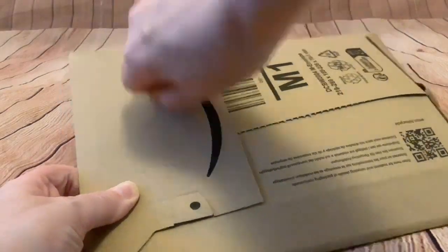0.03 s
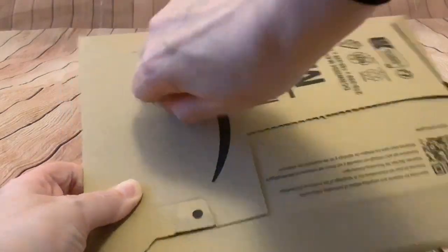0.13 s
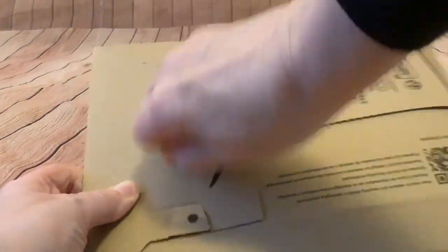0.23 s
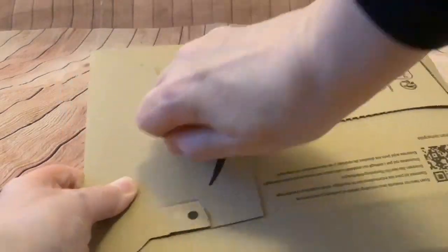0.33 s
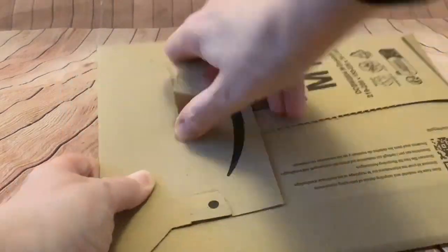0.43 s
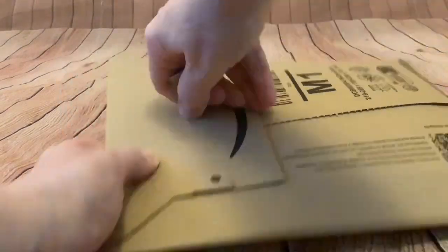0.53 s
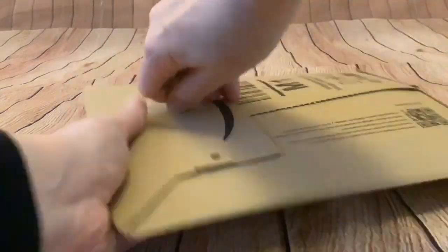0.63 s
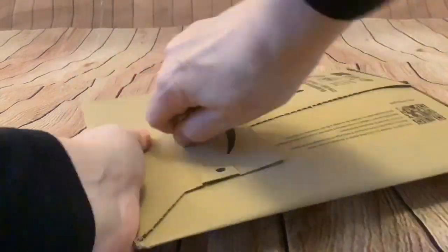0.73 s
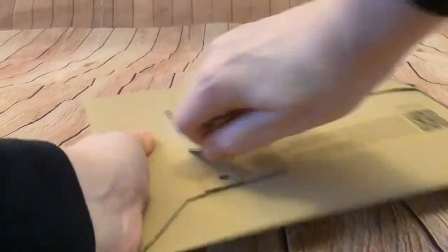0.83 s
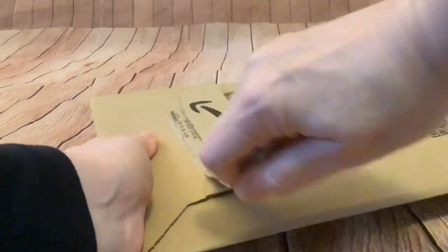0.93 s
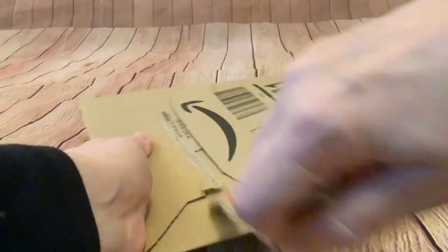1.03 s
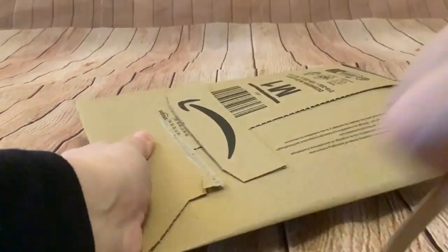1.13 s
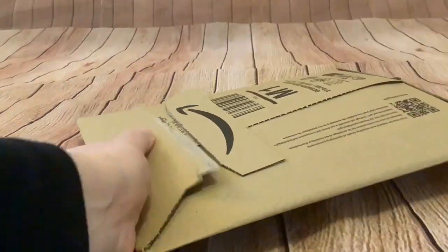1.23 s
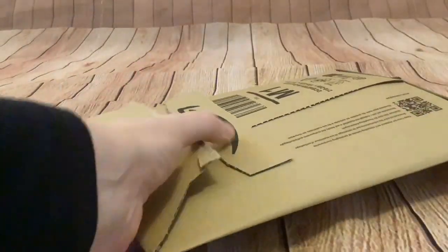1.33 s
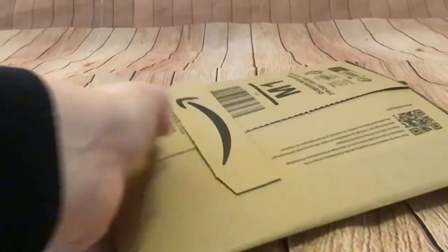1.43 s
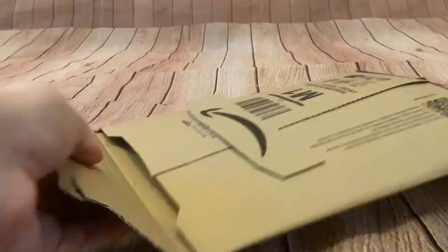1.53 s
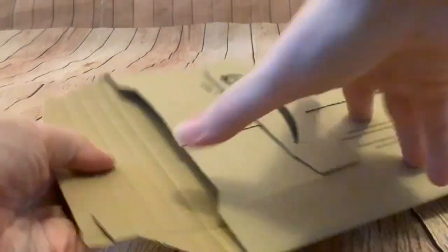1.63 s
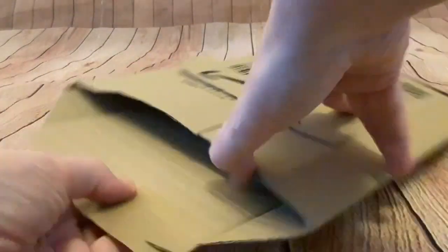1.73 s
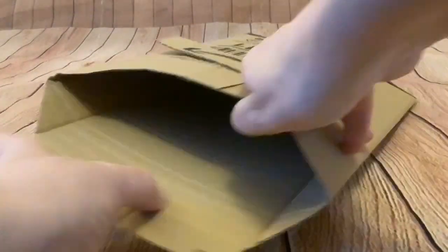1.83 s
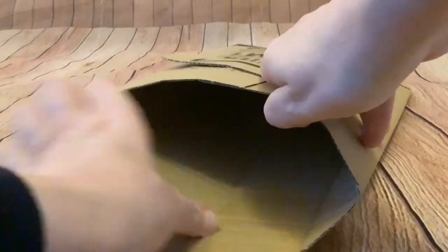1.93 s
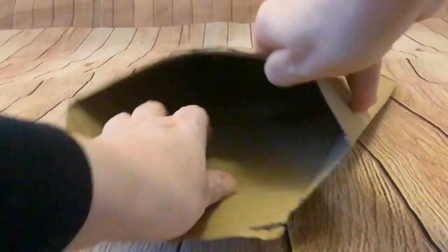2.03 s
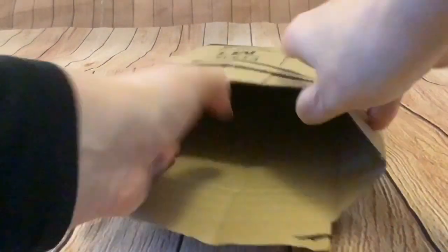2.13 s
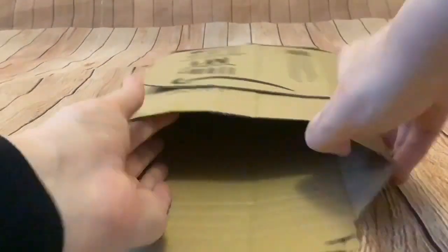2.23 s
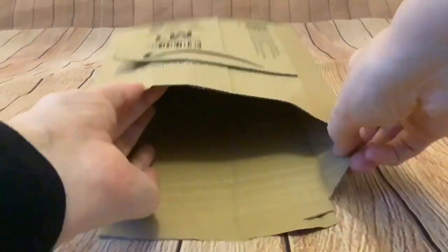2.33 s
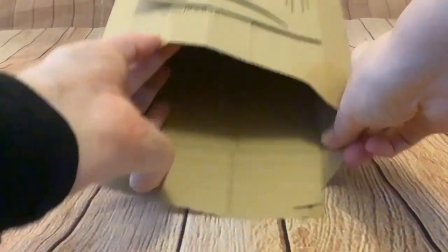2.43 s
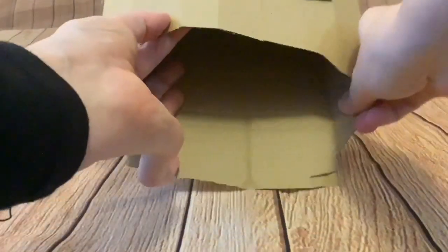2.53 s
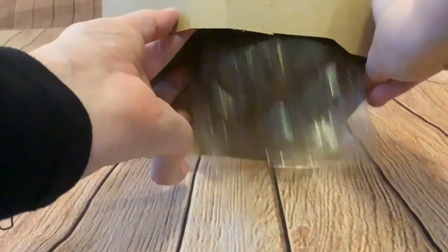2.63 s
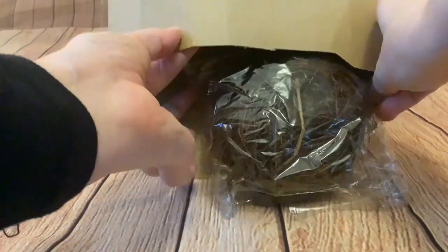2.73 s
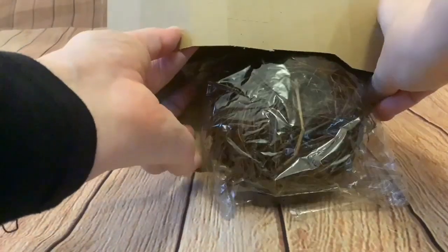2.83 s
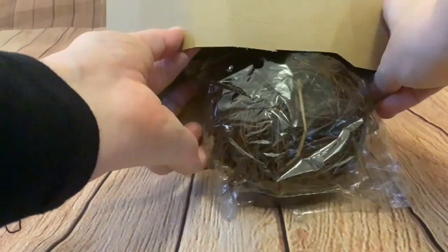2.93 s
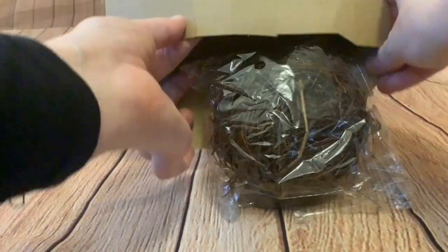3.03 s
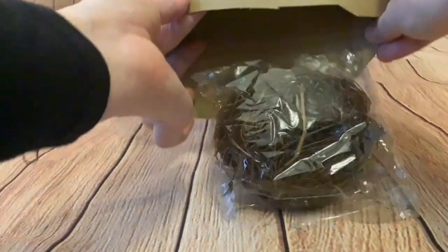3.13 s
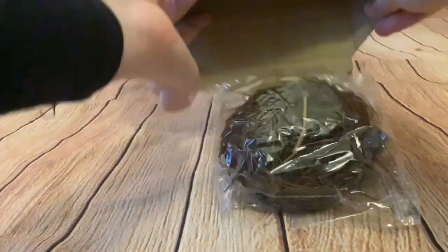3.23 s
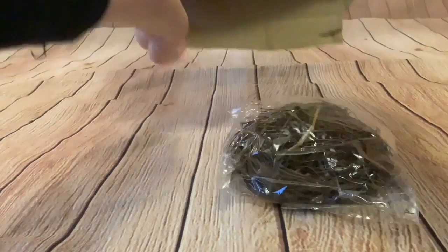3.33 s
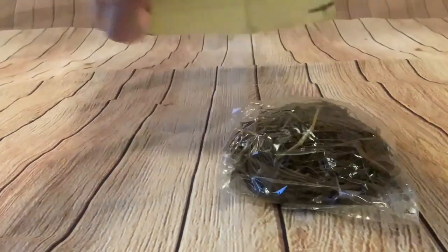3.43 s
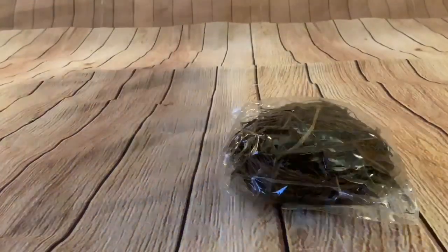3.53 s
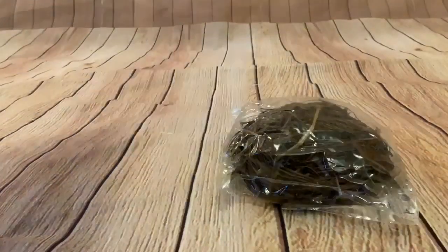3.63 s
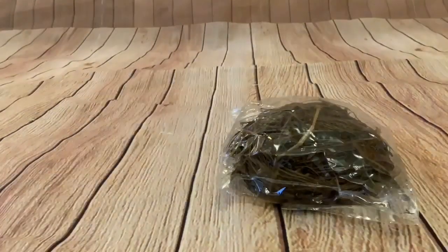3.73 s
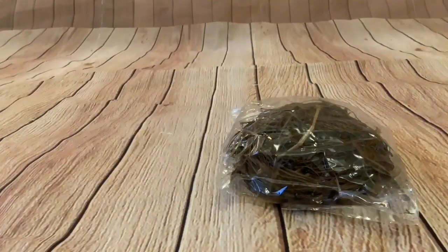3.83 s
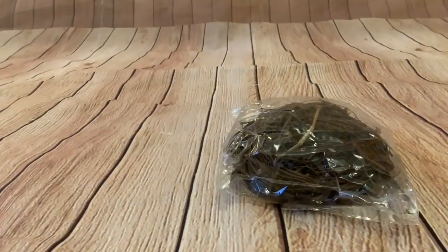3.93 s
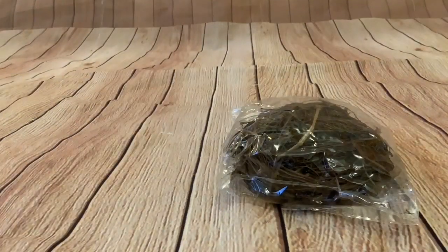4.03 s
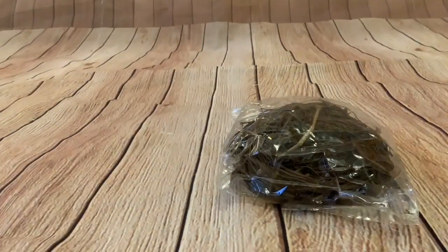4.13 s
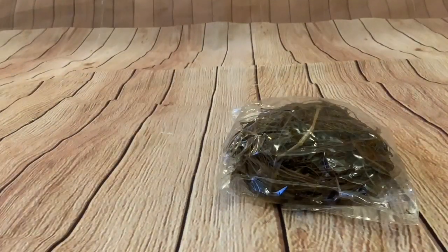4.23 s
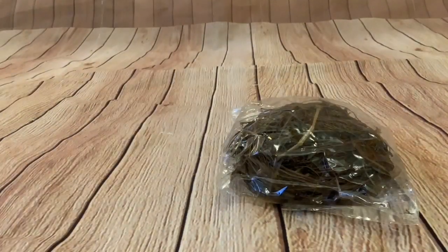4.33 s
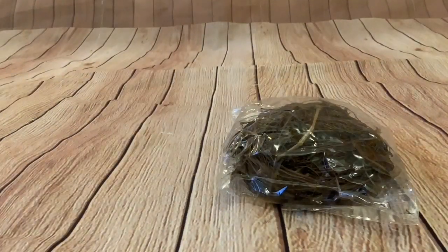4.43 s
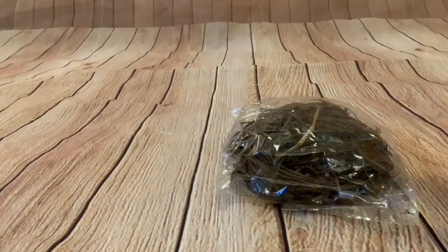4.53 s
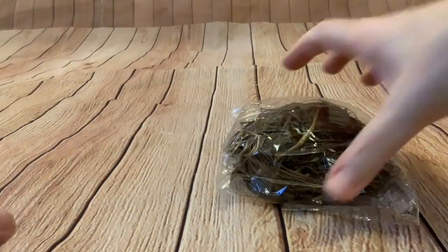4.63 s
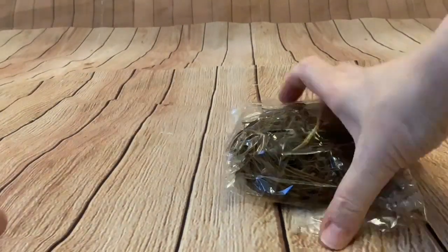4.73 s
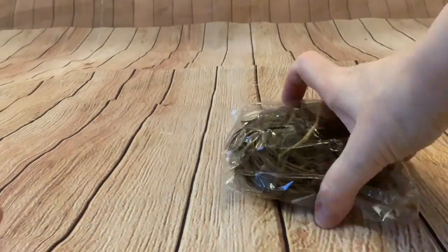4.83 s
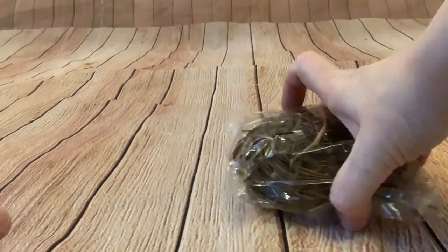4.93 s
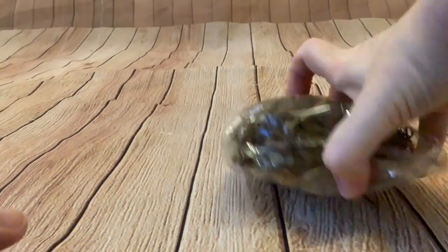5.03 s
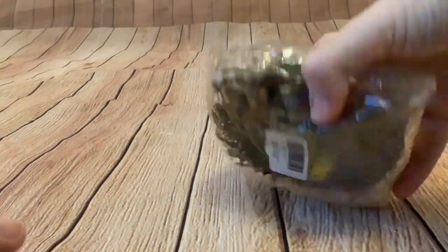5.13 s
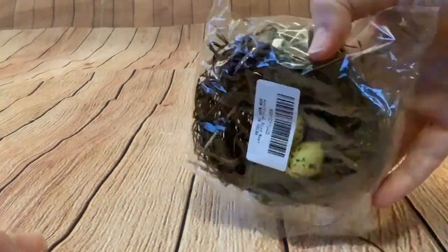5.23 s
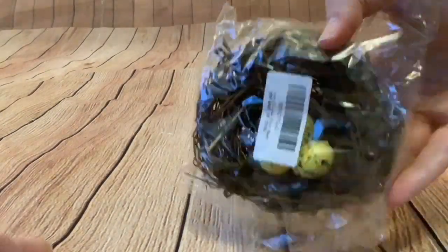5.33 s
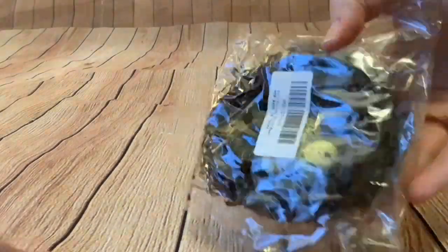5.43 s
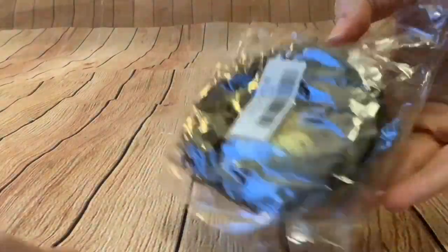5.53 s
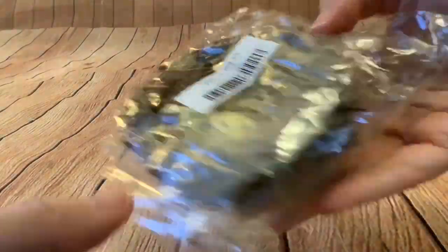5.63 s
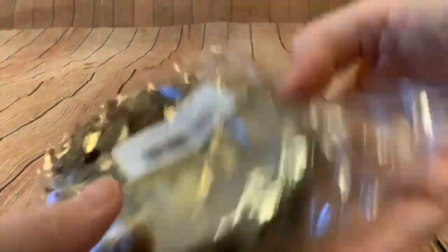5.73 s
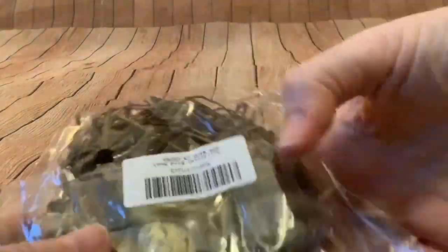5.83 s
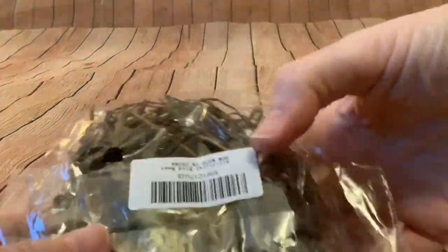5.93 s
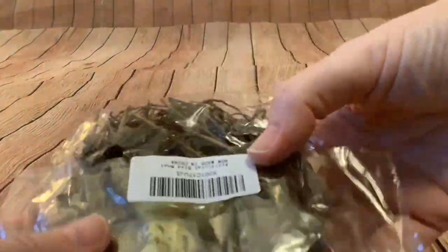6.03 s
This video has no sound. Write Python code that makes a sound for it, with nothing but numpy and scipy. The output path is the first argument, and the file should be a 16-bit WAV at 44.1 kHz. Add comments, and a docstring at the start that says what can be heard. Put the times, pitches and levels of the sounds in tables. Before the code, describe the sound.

Crisp card fibres rip and crack in bursts, stiff card rustles and knocks aside, then plastic film crackles sharply in the hands.

```python
"""Card fibres snap as a mailer on a wooden table is torn open along its strip, spread apart, emptied
and put aside: each burst of noise cracks brightly, then excites the modes of the hollow card.
A thin plastic bag slides out, is picked up and crinkles close by, as short flips ringing in high bands.
Rubbing is dense random grains; the blows of the card laid down are decaying noise through its modes.
A short diffuse tail surrounds the sounds near the table; a small microphone drops the bass."""
import sys
import numpy as np
from scipy import signal
from scipy.fft import rfft, irfft, next_fast_len
from scipy.io import wavfile

SR = 44100
rng = np.random.default_rng(int(sys.argv[2]) if len(sys.argv) > 2 else 0)


def output_pcm(signal):
    """Save a mono or channel-first signal as 16-bit PCM at the path in sys.argv[1].

    Samples are clipped to [-1, 1] before scaling.
    """
    pcm = np.clip(np.atleast_2d(signal).T, -1, 1) * 32767
    wavfile.write(sys.argv[1], SR, np.round(pcm).astype(np.int16))


N = 268569   # length in samples


def from_db(db):
    """Logarithmic level: decibels to amplitude gain."""
    return 10 ** (np.asarray(db) / 20)


def rms_one(x):
    """Normalisation to unit root-mean-square amplitude."""
    return x / np.sqrt(np.mean(x ** 2) + 1e-20)


def in_time(rows):
    """Linear interpolation of the columns of a curve table, sample by sample."""
    s, *columns = np.transpose(rows)
    return [np.interp(np.arange(N) / SR, s, column) for column in columns]


def drift(rate):
    """Low-passed noise: slow fluctuation of unit rms, changing about rate times a second."""
    r = np.exp(-2 * np.pi * rate / SR)
    noise = rng.standard_normal(N + SR)
    slow = signal.lfilter([1], [1, -2 * r, r * r], noise)
    return rms_one(slow[SR:])   # the first second lets the filter settle


def grains(per_s, spread_db):
    """Impulse noise: clicks at random instants, of very uneven size and either sign."""
    sizes = from_db(spread_db * np.minimum(rng.exponential(1, N), 4))
    signs = rng.choice([-1, 1], N)
    return sizes * signs * (rng.random(N) < per_s / SR)


def resonance(x, hz, width_hz):
    """Damped oscillator: a two-pole band with unit gain on top."""
    r = np.exp(-np.pi * width_hz / SR)
    poles = [1, -2 * r * np.cos(2 * np.pi * hz / SR), r * r]
    return signal.lfilter([(1 - r * r) / 2, 0, (r * r - 1) / 2], poles, x + 1e-18)


def body(x, modes, spread_db=0, favoured_hz=None, wander_db=0):
    """Modal superposition: parallel modes, each with its own, possibly wandering, excitation strength."""
    hz, width_hz, db = np.transpose(modes)
    db = db + spread_db * rng.normal(0, 1, len(modes))
    if favoured_hz:   # a blow loses 14 dB per octave away from this pitch
        db = db - 14 * np.abs(np.log2(hz / favoured_hz))
    if wander_db:   # steady rubbing
        db = [level + wander_db * drift(26) for level in db]
    # neighbouring modes alternate in sign
    return sum((-1) ** k * from_db(db[k]) * resonance(x, hz[k], width_hz[k]) for k in range(len(modes)))


# modes of the card panel and of the hollow inside, both played by body(): f/Hz, bandwidth/Hz, level/dB
PANEL_MODES = [(128, 66, -6.5), (164, 79, -1.5), (238, 72, 0.5), (294.7, 93, -1), (394, 92, -2),
               (463, 56, -1.5), (566, 94, -6.5)]
CAVITY_MODES = [(624, 37, -11), (836, 190, -6.5), (1050, 355, -1), (1158, 230, 0.5), (1550, 298, -10),
                (1750, 840, -20)]

# spectral colour of dry rustling: f/Hz, level/dB (per Hz)
RUSTLE_SPECTRUM = [(1100, -40.5), (1800, 2), (2450, -6), (3000, -4.5), (4700, -4), (10000, -1.5),
                   (15000, -6), (16500, -0.5)]


def bright(x):
    """Spectral shaping: the colour of dry rustling, interpolated over log frequency."""
    hz, db = np.transpose(RUSTLE_SPECTRUM)
    size = next_fast_len(len(x))
    log_hz = np.log(np.arange(size // 2 + 1) * SR / size + 1)
    gain = from_db(np.interp(log_hz, np.log(hz), db))
    return irfft(rfft(x, size) * gain, size)[:len(x)]


def far(x):
    """Band limitation: card out of reach keeps a papery band and loses its top."""
    far_hz, width_hz = 3100, 2200
    papery = resonance(resonance(x, far_hz, width_hz), far_hz, width_hz)
    return papery + 0.075 * x


def add(out, s, peak_db, sound):
    """Linear superposition: places a short sound at its time and peak level."""
    i = max(round(s * SR), 0)
    sound = sound[:N - i]
    out[i:i + len(sound)] += from_db(peak_db) * sound / np.abs(sound).max()


ROOM_T60_S, ROOM_DB = 0.17, -12.5   # time to fall by 60 dB; level of the unit-energy tail


def room(x):
    """Reverberation: a short, exponentially decaying diffuse tail from the table top and near walls."""
    t = np.arange(SR // 3) / SR
    decay = from_db(-60 * t / ROOM_T60_S)
    tail = rng.standard_normal(len(t)) * decay * (t > .003)
    return signal.fftconvolve(x, tail / np.sqrt(np.sum(tail ** 2)))[:N]


def hiss():
    """Stationary white noise: a faint floor."""
    return from_db(-84.5) * rng.standard_normal(N)


RUMBLE_S, RUMBLE_DB = 5.9, -31.5   # onset, rms level once risen


def rumble():
    """Low-frequency turbulence: the hand brings the bag close and stirs the air at the microphone."""
    swell = np.clip((np.arange(N) / SR - RUMBLE_S) / 0.019, 0, 1)
    return from_db(RUMBLE_DB) * swell * drift(30)


SQUEAK_S, SQUEAK_LENGTH_S = 4.948, .045
SQUEAK_HZ, SQUEAK_DB = 423, -42


def squeak():
    """Stick-slip: a finger slips on the film with a brief, slightly unsteady note."""
    out, t = np.zeros(N), np.arange(round(SQUEAK_LENGTH_S * SR)) / SR
    unsteady_time = np.cumsum(1 + 0.063 * drift(57)[:len(t)]) / SR
    tone = np.sin(2 * np.pi * SQUEAK_HZ * unsteady_time)
    envelope = np.sin(np.pi * t / SQUEAK_LENGTH_S) ** 0.19
    add(out, SQUEAK_S, SQUEAK_DB, tone * envelope)
    return out


# empty mailer laid down out of reach:
# t/s, panel peak level/dB, cavity peak level/dB, favoured panel f/Hz, shudder decay/s
LAYING_DOWN_KNOCKS = [(3.614, -29, -55, 180, 0.01), (3.645, -37, -40, 248, 0.015),
                      (3.681, -33, -48, 302, 0.015), (3.703, -24, -53, 347, 0.0038),
                      (3.769, -21, -45, 403, 0.0027), (3.846, -49.5, -52.5, 407, 0.072),
                      (4.35, -31, -46, 291, 0.021), (4.41, -19, -24, 575, 0.016)]


def knocks():
    """Impact excitation: a sudden dull contact, then a shudder to rest, waking the low cavity modes."""
    out, t = np.zeros(N), np.arange(SR // 5) / SR
    for s, panel_db, cavity_db, panel_hz, length in LAYING_DOWN_KNOCKS:
        envelope = np.exp(-t / 0.00021) + 0.32 * np.exp(-t / max(length, .001))
        shudder = rng.standard_normal((2, len(t))) * envelope
        dull = signal.lfilter([1], [1, -1.8, .81], shudder)
        cavity = body(dull[0], CAVITY_MODES, spread_db=3.0, favoured_hz=787)
        favoured_panel = body(dull[1], PANEL_MODES, spread_db=3.5, favoured_hz=panel_hz)
        add(out, s, cavity_db, cavity)
        add(out, s, panel_db, favoured_panel + 0.37 * body(dull[1], PANEL_MODES))
    return out


# separate movements of the hands and contents:
# t/s, length/s, rustle level/dB, swell by the end/dB, panel level over rustle/dB
MOVEMENTS = [(0.0, 1, -52.5, -8, 3.5), (0.348, 0.093, -59, 15.5, 1), (0.522, 0.013, -48, -4, -16),
             (0.59, 0.06, -52, 4.5, -5), (0.703, 0.036, -51, 8.5, 3.5), (0.801, 0.03, -37, 0, 9.5),
             (0.866, 0.085, -44.5, 2, 10.5), (0.997, 0.045, -34, 1, 9), (1.094, 0.047, -41, -14, -32),
             (1.195, 0.33, -59.5, 5.5, -2.5), (1.543, 0.14, -64.5, 14.5, -8.5), (1.7, 0.23, -46, -2, 0),
             (1.963, 0.18, -46.5, -4, -0.5), (2.171, 0.13, -55.5, 12.5, -6), (2.313, 0.42, -48, 5, -8),
             (2.657, 0.091, -27, -19.5, -7.5), (2.801, 0.18, -56.5, -10, -4),
             (2.946, 0.15, -49.5, -9, -7.5), (3.094, .215, -52, 10, -5), (3.372, 0.088, -62.5, 11, -1),
             (3.496, 0.15, -66, 19, -3.5), (3.683, 0.026, -42, -1, 6.5), (3.759, 0.014, -47.5, 3, 2),
             (3.78, 0.11, -58.5, -5.5, 8), (3.994, 0.11, -57, -2, 4.5), (4.166, 0.11, -74.5, 14.5, 5.5),
             (4.36, 0.0092, -54.5, -12, 22), (4.415, 0.041, -62, -5, 29.5), (4.48, 0.19, -83, -13, 27),
             (4.711, 0.051, -61, 20, -5.5), (4.808, 0.12, -40, -3.5, -5.5), (4.951, 0.32, -45.5, 8.5, -7),
             (5.272, 0.31, -45, -7, -5), (5.632, 0.24, -40.5, 1.5, -7.5), (5.912, 0.054, -47, 9.5, -15.5),
             (5.981, .11, -34.5, -5, -4.5)]
# fibres of the card snapping or buckling, played by movements() as fizz and by snaps() as cracks:
# t/s, crack peak level/dB, cavity peak level/dB, panel peak level/dB, favoured panel f/Hz, crack length/s
FIBRE_SNAPS = [(0.0014, -10, -13.5, -15, 375, 0.0014), (0.029, -20, -24.5, -14, 350, 0.0026),
               (0.0353, -12, -11.5, -23.5, 193, 0.0038), (0.0431, -19, -11.5, -19, 246, 0.0033),
               (0.0553, -17, -18, -18, 246, 0.002), (0.131, -45, -37, -24.5, 388, 0.001),
               (0.153, -20, -15, -14, 217, 0.0028), (0.175, -19, -24.5, -15.5, 218, 0.008),
               (0.2368, -13, -19, -13.5, 398, 0.0031), (0.2479, -18, -22, -12, 208, 0.0024),
               (0.3535, -27.5, -32, -38.5, 225, 0.0049), (0.3928, -41, -36, -31.5, 376, 0.0017),
               (0.7046, -20.5, -39, -52, 388, 0.0062), (0.7324, -19.5, -28, -21.5, 246, 0.0059),
               (0.7966, -17, -52.5, -24, 298, 0.0035), (0.803, -28, -34, -11, 330, 0.0039),
               (0.812, -10, -12, -13.5, 368, 0.0038), (0.8168, -24, -36, -14, 382, 0.0039),
               (0.8305, -25, -37, -17, 339, 0.0062), (0.8713, -21, -32.5, -36, 332, 0.0085),
               (0.8848, -17, -24, -16.5, 215, 0.001), (0.896, -13, -41, -20.5, 340, 0.0019),
               (0.916, -24, -34, -11.5, 368, 0.0027), (0.923, -12.5, -30, -27.5, 382, 0.00096),
               (0.9397, -11, -18, -7.5, 322, 0.0005), (0.9522, -18, -20, -10.5, 360, 0.0018),
               (0.996, -29, -56.5, -15.5, 334, 0.00099), (1.0054, -18, -18, -10, 320, 0.0033),
               (1.0182, -15.5, -11.5, -9.5, 370, 0.00057), (1.0339, -12.5, -22.5, -20, 238, 0.0017),
               (1.0809, -21.5, -33, -32, 505, 0.0016), (1.707, -39, -53, -55, 198, 0.0023),
               (1.745, -33, -31.5, -57, 302, 0.0021), (1.977, -33, -27.5, -32.5, 340, 0.00093),
               (2.1403, -56, -65, -33.5, 164, 0.0027), (2.2903, -53, -40, -34, 258, 0.0014),
               (2.374, -40, -32.5, -43, 300, 0.0053), (2.6696, -7, -26.5, -18.5, 394, 0.0046),
               (3.267, -20.5, -29.5, -32, 330, 0.0036), (3.297, -47, -47, -31.5, 300, 0.0023)]
ATTACK_DB_PER_S, RELEASE_DB_PER_S = 2601.5, 647
SNAP_FIZZ_DB = -30   # rustle that a snap leaves behind, relative to the peak of its crack


def movements():
    """Addition of powers: each movement sets in fast, swells or fades evenly in dB and dies away."""
    t, power = np.arange(N) / SR, np.full((2, N), 1e-12)   # rows: surface, panel
    fizz = [(s, length, crack_db + SNAP_FIZZ_DB, 0, 0) for s, crack_db, *_, length in FIBRE_SNAPS]
    for s, length, db, swell_db, panel_db in MOVEMENTS + fizz:
        near = slice(max(round((s - .1) * SR), 0), round((s + length + .3) * SR))
        since = t[near] - s
        level = db + swell_db * np.clip(since / length, 0, 1)
        level += ATTACK_DB_PER_S * np.minimum(since, 0)
        level -= RELEASE_DB_PER_S * np.maximum(since - length, 0)
        power[:, near] += from_db([level, level + panel_db]) ** 2
    return 10 * np.log10(power)


def crackle():
    """Buckling of film: clumps of ragged ticks dealt to facets of many sizes; larger folds pop lower."""
    clicks = grains(900 * from_db(4.6 * drift(38)), spread_db=3.0)
    fade = np.exp(-1 / (0.00038 * SR))
    pitches = np.geomspace(1500, 15500, 12)
    dealt = rng.integers(0, 12, N)
    ragged = rng.standard_normal(N)
    flips = []
    for k in range(12):
        envelope = signal.lfilter([1], [1, -fade], clicks * (dealt == k) + 1e-18)
        flips.append(np.roll(ragged, 997 * k) * envelope)   # shifted noise keeps the facets unlike
    facets = bright(sum(resonance(flip, hz, .5 * hz) for flip, hz in zip(flips, pitches)))
    folds = body(sum(flips[:3]), CAVITY_MODES)
    return rms_one(facets) + 0.33 * rms_one(folds)


# what rustles: t/s, share of plastic crackle (0-1), share of dull card far from the microphone (0-1)
RUSTLING_MATERIAL = [(0, 0, 0.2), (1.2, 0, 0.05), (1.3, 0.3, 0.02), (2.5, 0.09, 0.03), (2.8, 0.4, 0.04),
                     (3.33, 0.43, 0.1), (3.42, 0, 0.75), (4.68, 0, .97), (4.71, 0.87, 0), (6.09, 1, 0)]
CAVITY_OVER_DB, CAVITY_FOLLOWS = -1, 0.34   # cavity over rustle; share of the panel's excess added to it
PLASTIC_DAMPS_DB = -4   # cavity change when only plastic rustles


def handling():
    """Friction noise: rubbing in fits and starts, the same jerks exciting surface, cavity and panel."""
    rustle_db, panel_db = movements()
    plastic, away = np.clip(in_time(RUSTLING_MATERIAL), 0, 1)
    cavity_db = rustle_db + CAVITY_OVER_DB + CAVITY_FOLLOWS * (panel_db - rustle_db)
    cavity_db += PLASTIC_DAMPS_DB * plastic
    jerks = from_db(2.67 * drift(8.1) + 2.28 * drift(45))

    friction = bright(grains(11000, spread_db=2.5))
    # bands that wander in level one by one
    shifting = sum(from_db(1.0 * drift(13.0)) * resonance(friction, hz, 0.46 * hz)
                   for hz in (2450, 5360, 7400, 12700, 15900))
    near_card = np.sqrt(1 - away) * rms_one(shifting)
    far_card = np.sqrt(away) * rms_one(far(friction))
    card = rms_one(jerks * (near_card + far_card))
    rustle = np.sqrt(1 - plastic) * card + np.sqrt(plastic) * crackle()

    cavity = rms_one(body(jerks * grains(5000, spread_db=1.5), CAVITY_MODES, wander_db=1.77))
    panel = rms_one(body(jerks * grains(1500, spread_db=3.5), PANEL_MODES))
    return from_db(rustle_db) * rustle + from_db(cavity_db) * cavity + from_db(panel_db) * panel


# creases of the bag flipping over: t/s, peak level/dB, f/Hz (held to 15 kHz at most)
BAG_CREASES = [(1.8449, -19.5, 5200), (1.89, -25.5, 5350), (2.0535, -23, 5300), (2.4014, -24, 14300),
               (2.4651, -15.5, 15200), (2.4877, -22, 10300), (2.6196, -16.5, 11000), (2.648, -15, 14900),
               (2.82, -30, 3800), (2.849, -30.5, 9100), (2.8592, -36.5, 6400), (2.9232, -30.5, 11800),
               (3.0671, -39, 6000), (3.1015, -44, 14600), (3.1627, -22, 9700), (3.192, -26, 11500),
               (3.243, -28, 6060), (3.298, -24, 5000), (3.347, -36, 11000), (3.472, -27.5, 11200),
               (4.74, -28, 11300), (4.7716, -27, 6300), (4.811, -19.5, 7200), (4.8372, -15, 12500),
               (4.8492, -14, 6650), (4.863, -28, 9000), (4.873, -37, 7400), (4.8923, -25, 6070),
               (4.9125, -16, 11100), (4.914, -25, 10800), (4.9815, -17.5, 7160), (5.022, -21, 7400),
               (5.053, -27, 7000), (5.127, -22, 10800), (5.1516, -15, 6300), (5.21, -37, 13000),
               (5.25, -39, 7540), (5.3474, -37, 6400), (5.3824, -19.5, 7400), (5.4354, -24, 6360),
               (5.5965, -24, 10400), (5.6522, -17.5, 9630), (5.688, -20, 13400), (5.7563, -11.5, 5800),
               (5.7915, -13.5, 7700), (5.8071, -16, 11000), (6.0015, -13.5, 5150), (6.0092, -16, 10500),
               (6.042, -7, 4440), (6.0804, -9.5, 14800)]


def crinkles():
    """Snap-through: a crease flips in under a millisecond, its neighbours follow, small facets ring high."""
    out, t = np.zeros(N), np.arange(SR // 40) / SR
    for s, peak_db, hz in BAG_CREASES:
        noise = rng.standard_normal((2, len(t)))
        neighbours = 0.017 * noise[1] ** 3 * np.exp(-t / 0.011)   # cubing makes them sparse
        flip = noise[0] * np.exp(-t / 0.00071) + neighbours
        facet = resonance(flip, min(hz, 15000), .5 * hz)
        add(out, s, peak_db, 0.91 * bright(flip) + 0.61 * facet)
    return out


STRIP_FREE_S, STRIP_FREE_DB, STRIP_HZ = 1.0828, -15.5, 1810


def strip_free():
    """Impulse response: the strip's last tab lets go with one clean tick, a couple of cycles long."""
    out, impulse = np.zeros(N), signal.unit_impulse(SR // 100)
    tick = resonance(resonance(impulse, STRIP_HZ, 2000), STRIP_HZ, 2000)
    add(out, STRIP_FREE_S, STRIP_FREE_DB, tick)
    return out


PANEL_LAG_CYCLES = 0.56   # low buckles take longer to build
PANEL_KICK = 14   # sudden kick at the height of a push, against its ragged part


def snaps():
    """Fracture: fibres break in a burst, the cavity rings with it, the heavy panel follows later and longer."""
    out, t = np.zeros(N), np.arange(SR // 10) / SR
    for s, crack_db, cavity_db, panel_db, panel_hz, length in FIBRE_SNAPS:
        length = max(length, .0005)
        noise = rng.standard_normal((3, len(t)))
        shape = t / length * np.exp(-2 * t / length)
        add(out, s, crack_db, bright(noise[0] * np.sqrt(np.abs(noise[0])) * shape))
        add(out, s, cavity_db, body(noise[1] * shape, CAVITY_MODES, favoured_hz=990))

        build = t / (length + PANEL_LAG_CYCLES / panel_hz)
        push = build ** 2 * np.exp(-3 * build ** 2)
        kick_size = PANEL_KICK * np.sqrt(np.sum(push ** 2) / 10)
        kick = kick_size * signal.unit_impulse(len(t), np.argmax(push))
        soft = resonance(noise[2] * push + kick, panel_hz, 1.5 * panel_hz)   # the board takes a blow softly
        add(out, s, panel_db, body(soft, PANEL_MODES, spread_db=1.5, favoured_hz=panel_hz))
    return out


def scene():
    """Superposition: sounds near the table share its short tail; rumble and hiss stay dry."""
    near = snaps() + knocks() + crinkles() + handling() + squeak() + strip_free()
    return (near + from_db(ROOM_DB) * room(near) + rumble() + hiss())[None]


BASS_CUT_HZ, TOP_CUT_HZ = 105, 15900


def record(dry):
    """Band-pass transmission: the small microphone drops the bass steeply; the top is cut."""
    bass_cut = signal.butter(6, BASS_CUT_HZ, "high", fs=SR, output="sos")
    top_cut = signal.ellip(10, .5, 60, TOP_CUT_HZ, fs=SR, output="sos")
    return signal.sosfilt(top_cut, signal.sosfilt(bass_cut, dry))


dry = scene()
out = record(dry)
output_pcm(out)
```